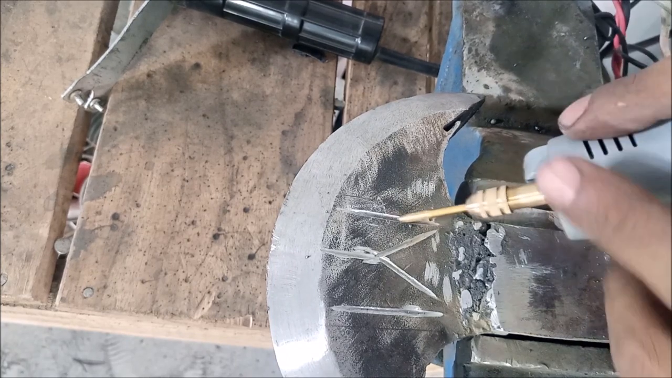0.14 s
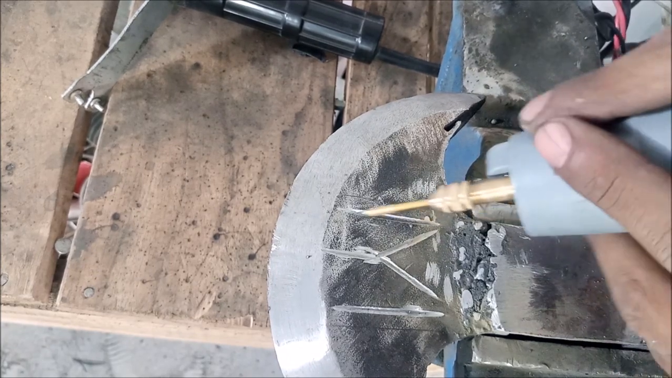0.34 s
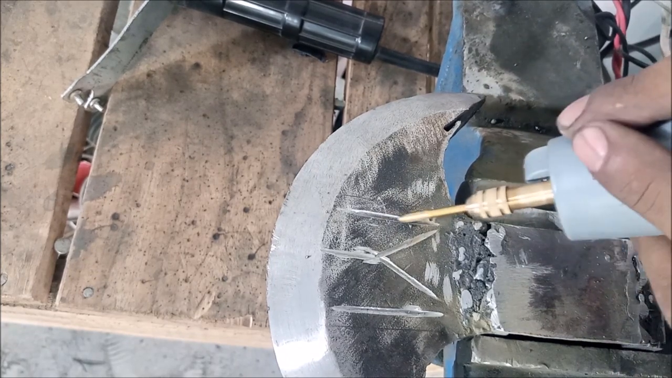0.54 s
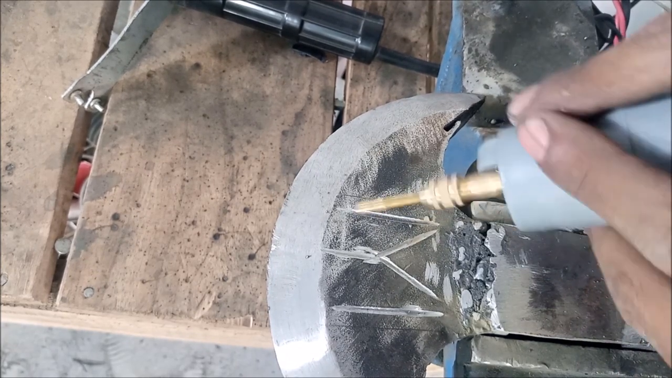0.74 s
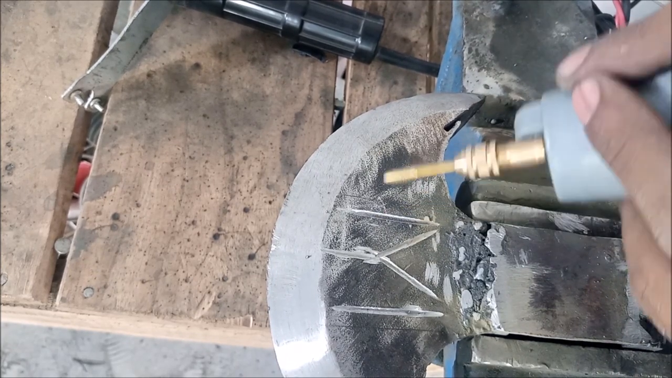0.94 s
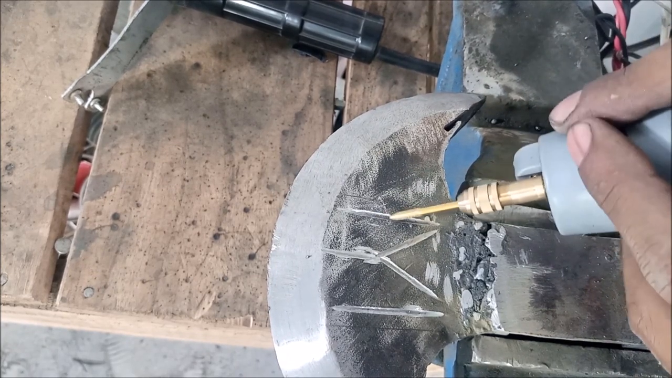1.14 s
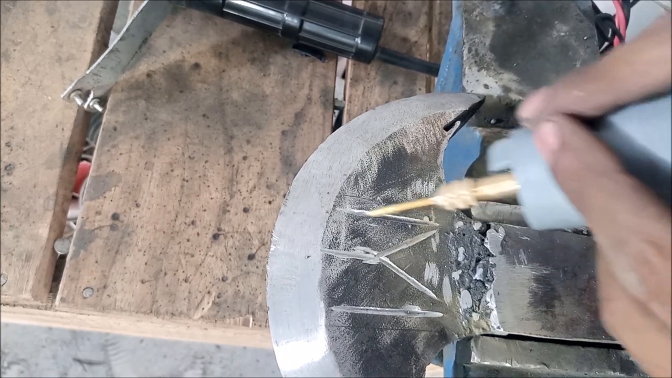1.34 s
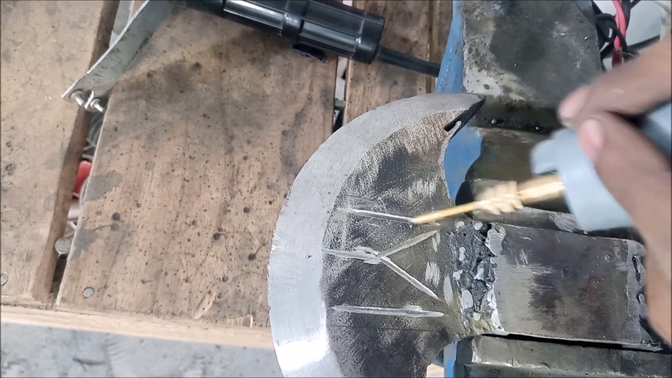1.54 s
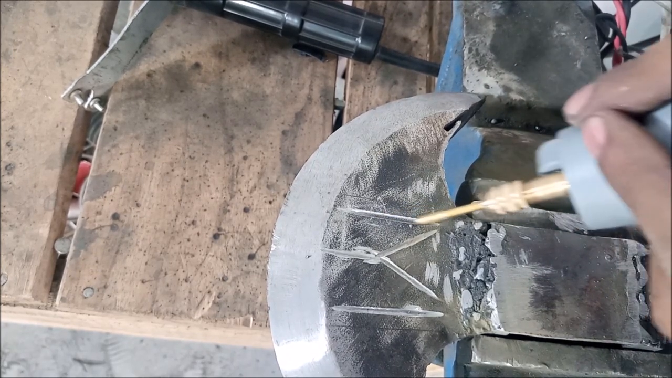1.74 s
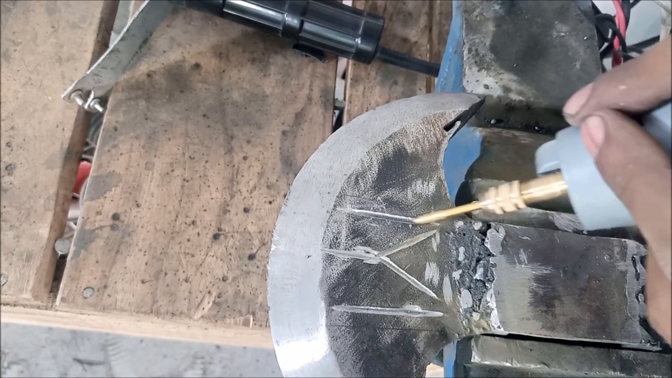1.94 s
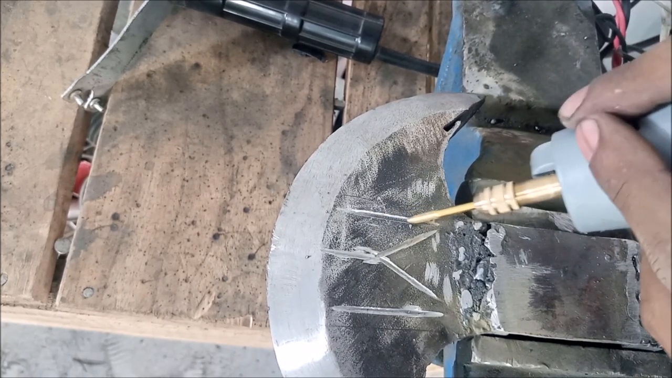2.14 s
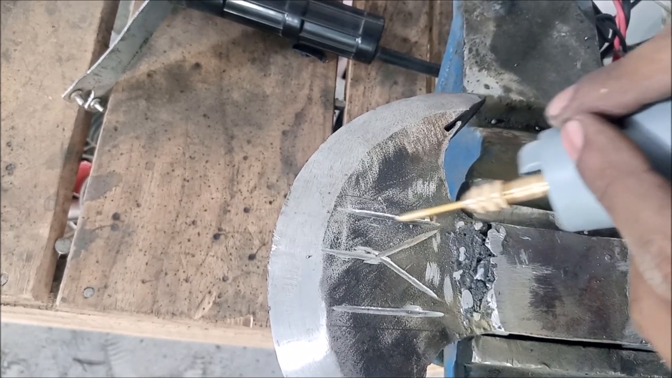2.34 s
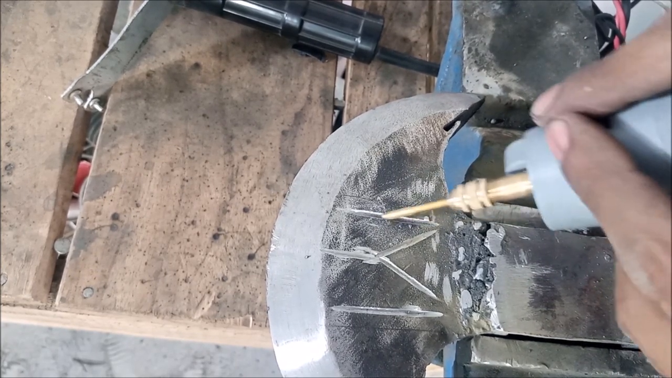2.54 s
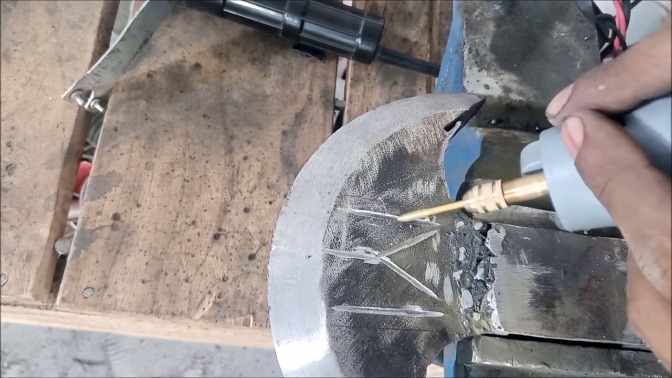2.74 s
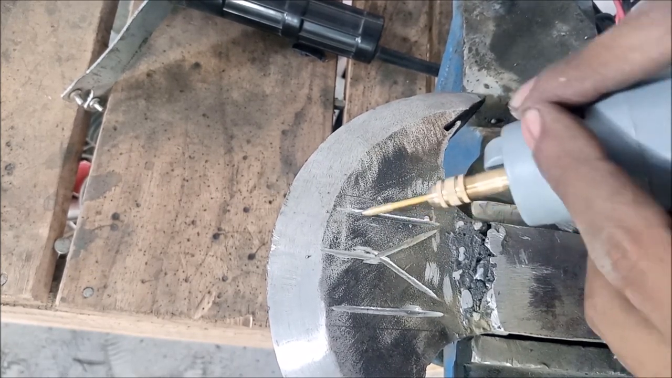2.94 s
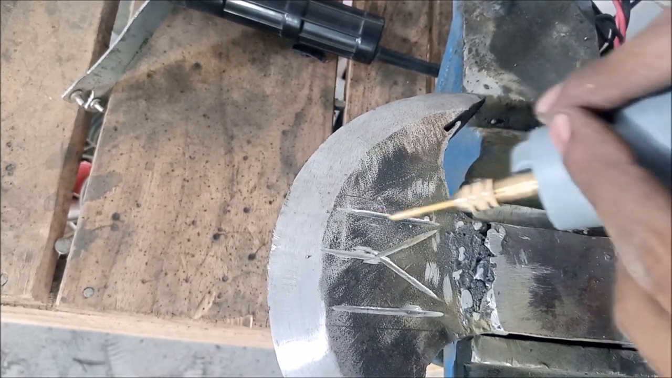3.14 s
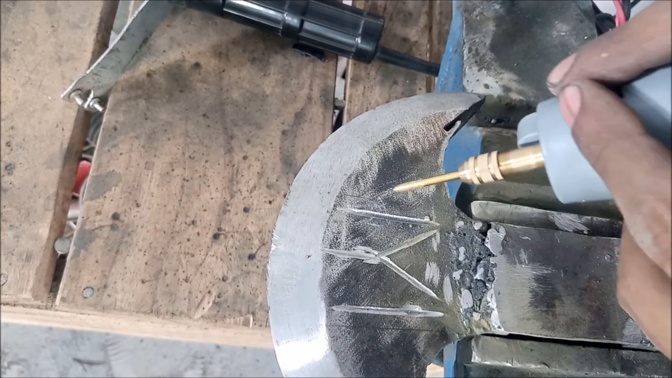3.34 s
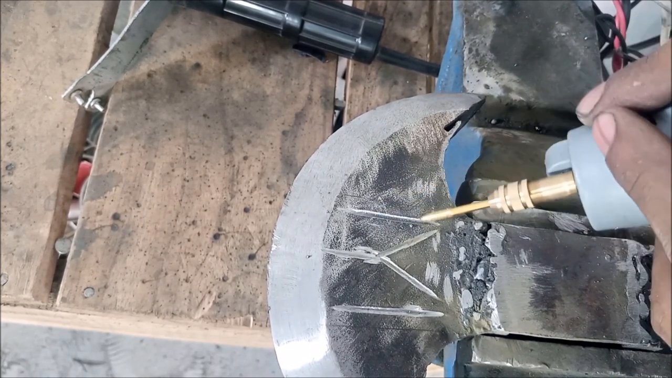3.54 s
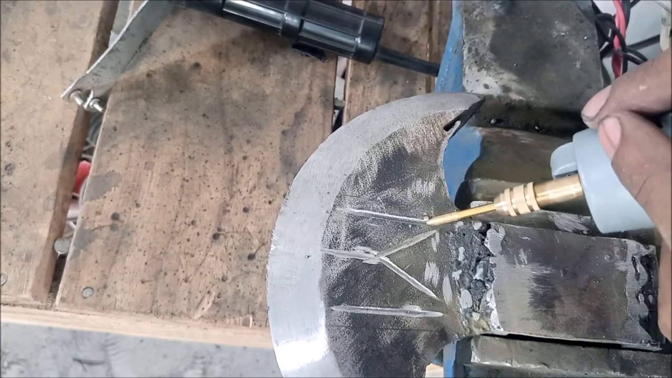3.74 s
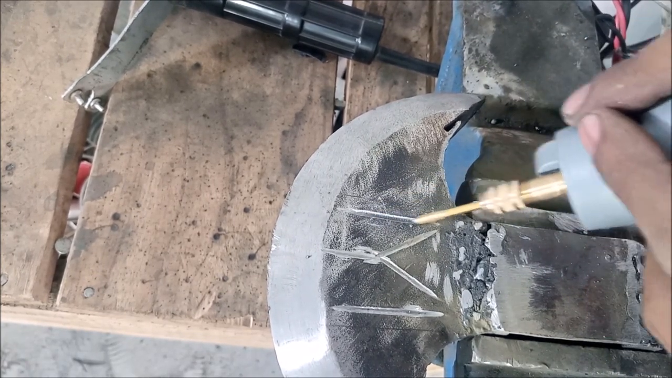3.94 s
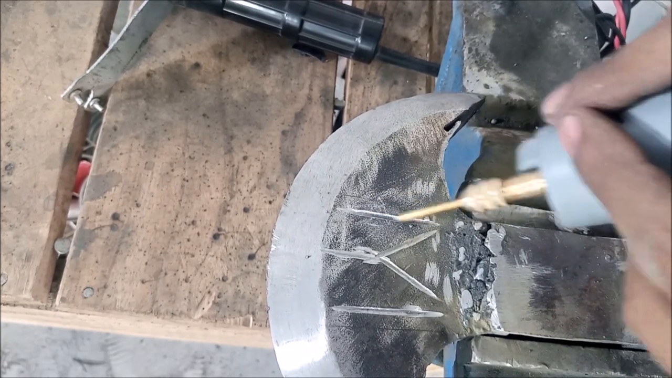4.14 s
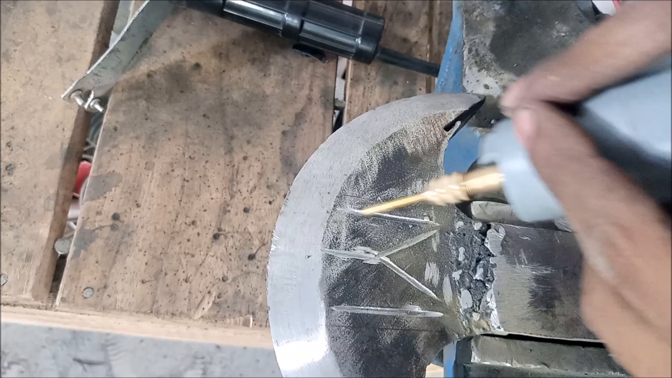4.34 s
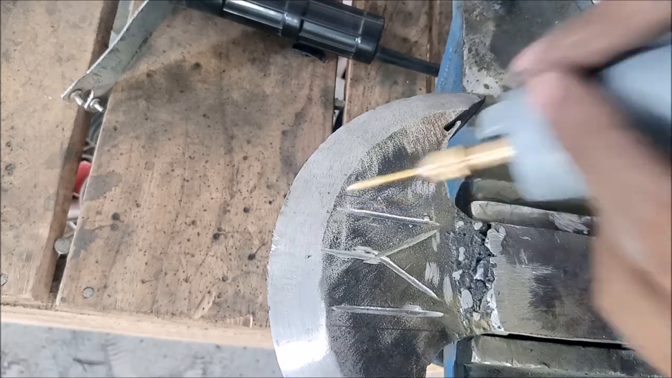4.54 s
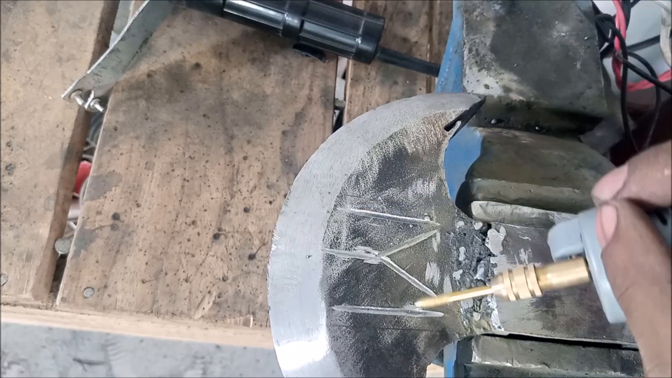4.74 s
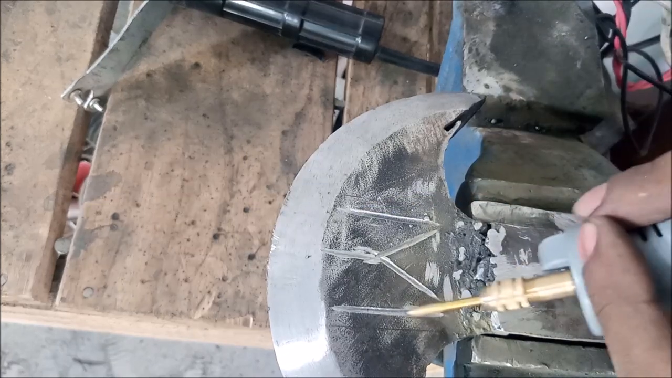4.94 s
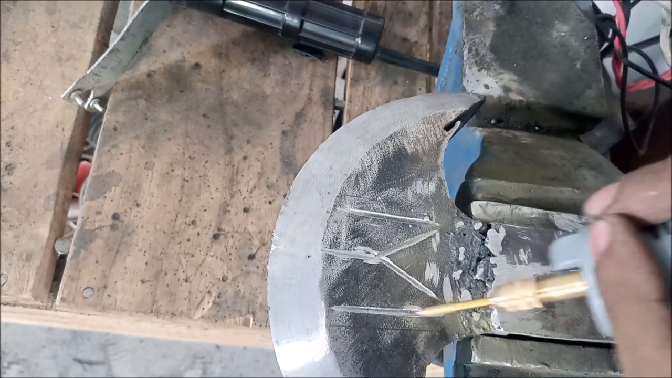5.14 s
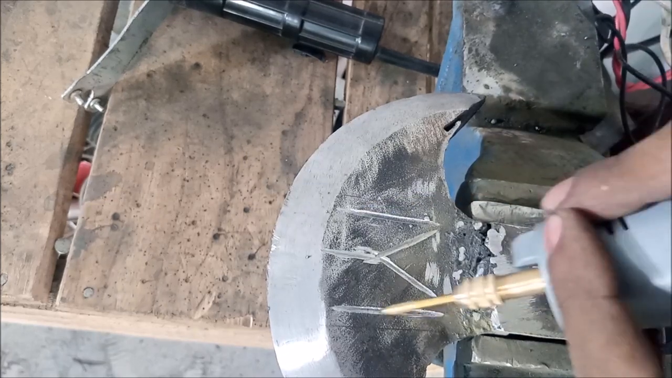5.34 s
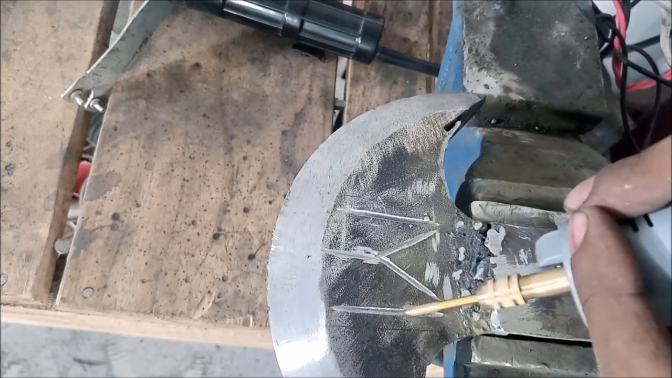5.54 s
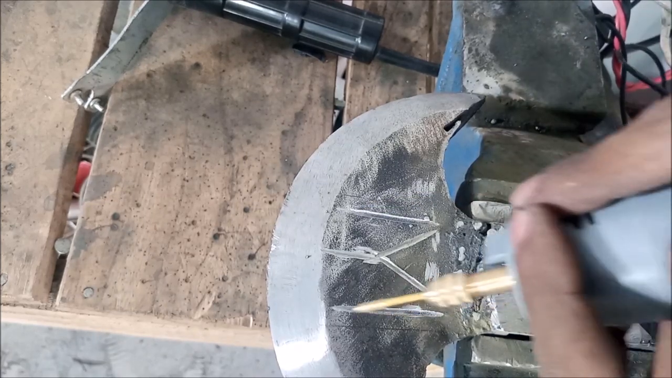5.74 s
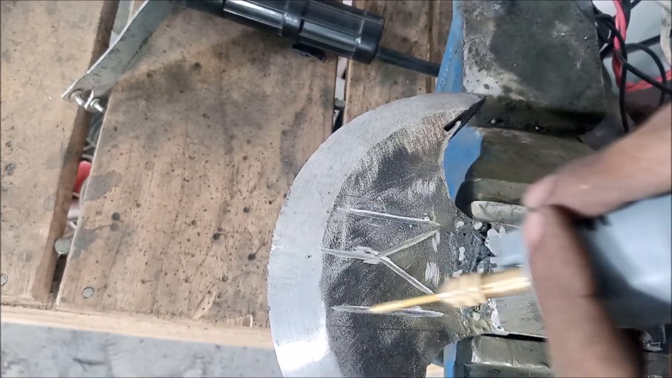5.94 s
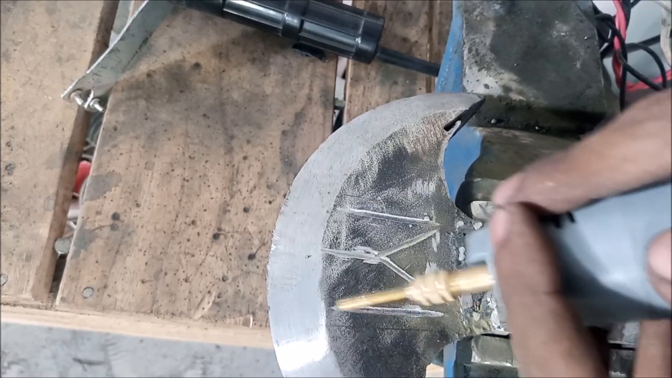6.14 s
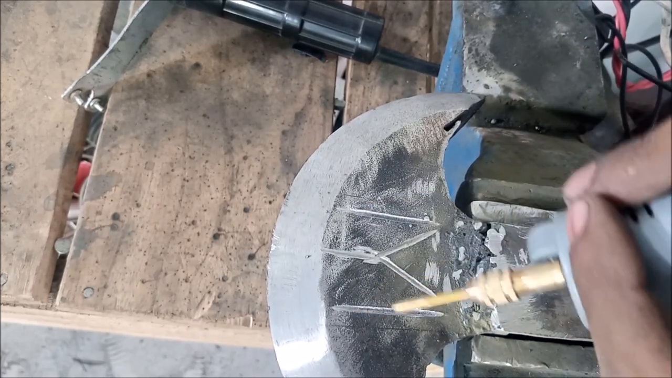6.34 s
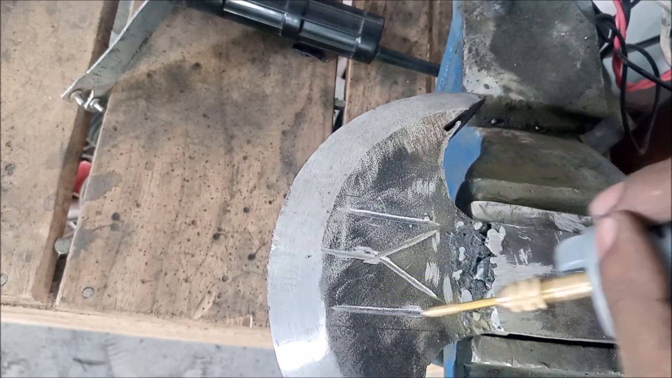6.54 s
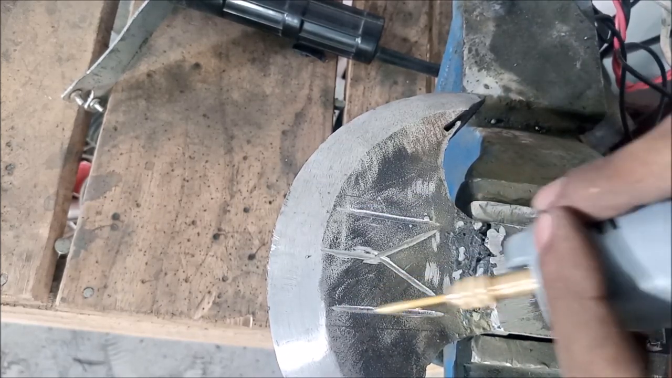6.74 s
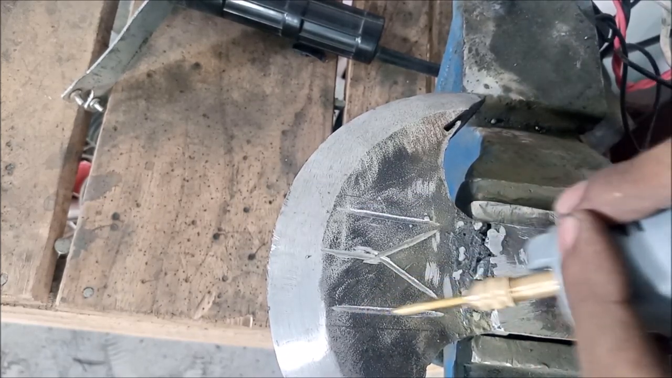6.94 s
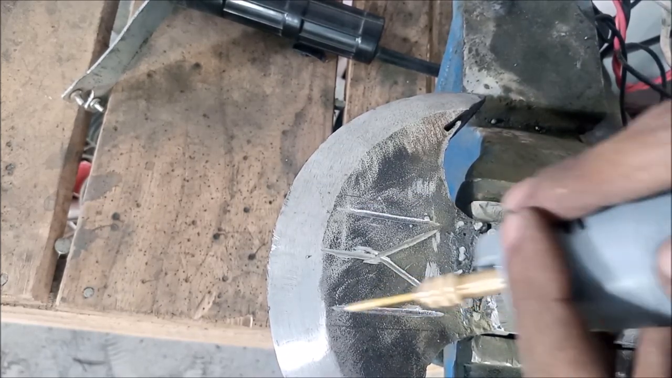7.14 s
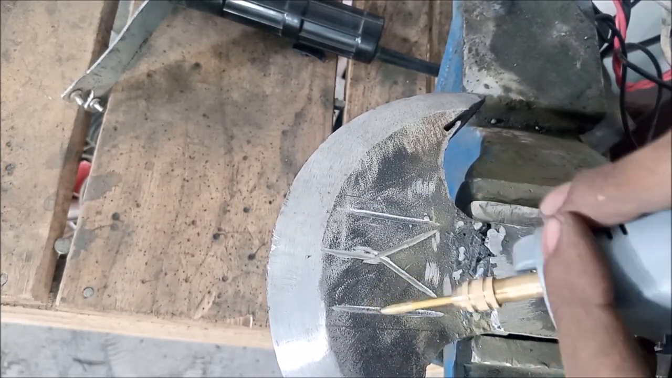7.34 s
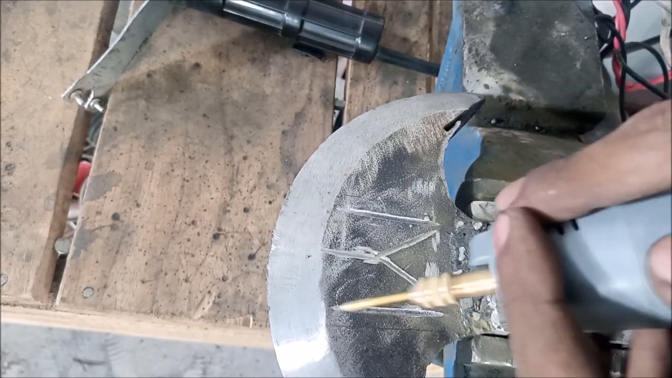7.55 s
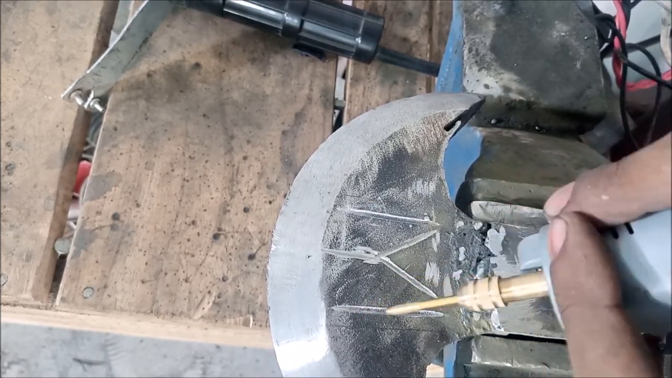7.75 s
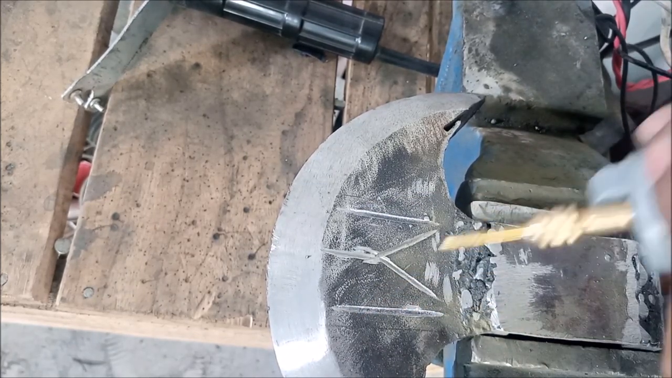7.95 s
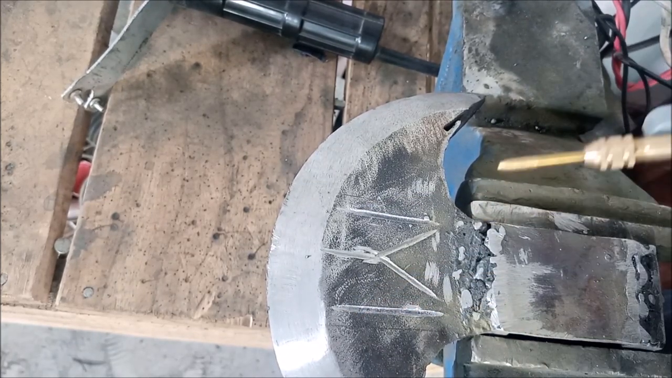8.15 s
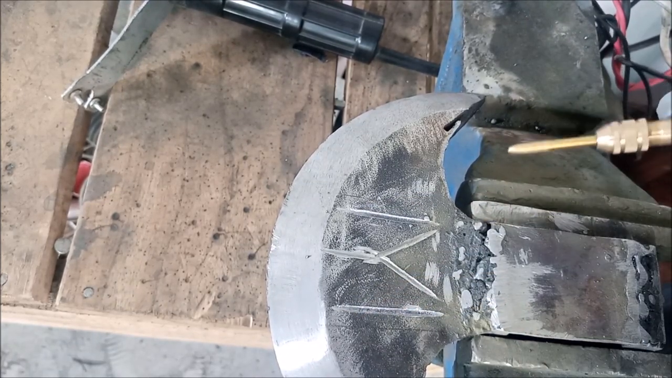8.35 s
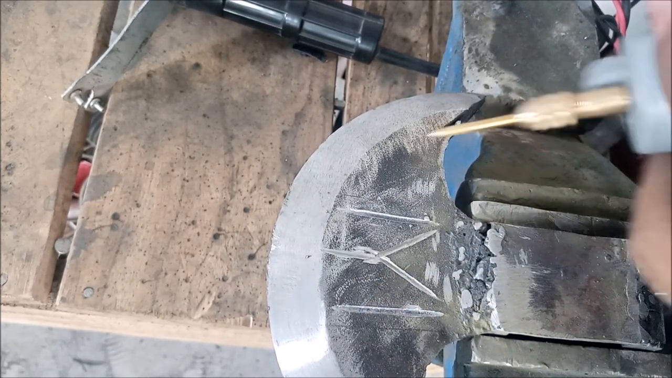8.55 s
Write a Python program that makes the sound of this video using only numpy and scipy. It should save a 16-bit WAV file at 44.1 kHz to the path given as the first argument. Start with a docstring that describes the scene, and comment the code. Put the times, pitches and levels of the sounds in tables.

```python
"""Engraving steel with a small rotary tool

A small rotary tool engraves two grooves in a clamped steel piece, in six strokes, heard from close by.
Free, its motor whines steadily: a stack of tones at multiples of the shaft speed, over a rush of air.
Pressed down, it slows with every push of the hand; the burr (the cutting tip) chatters once a turn
and grinds with a bright sizzle, made of those tones and noise shaped like the sound of the steel.
One high tone of the metal sings on after each lift. Dull bumps and a low hum come from the workshop."""
import sys
import numpy as np
from scipy import signal
from scipy.fft import rfft, irfft, next_fast_len
from scipy.io import wavfile
from scipy.ndimage import uniform_filter1d

SR = 44100
rng = np.random.default_rng(int(sys.argv[2]) if len(sys.argv) > 2 else 0)


def dump_mix(stems):
    """Bounce the given channels to the path in sys.argv[1] as a 16-bit WAV at rate SR."""
    frames = np.atleast_2d(stems).T  # one column per channel
    limited = np.clip(frames, -1, 1)  # hard clip at full scale
    pcm = np.round(limited * 32767).astype(np.int16)
    wavfile.write(sys.argv[1], SR, pcm)


N = 382788

# The times when the burr is on the metal, and base levels that the functions below vary:
# (touch [s], lift [s], snag [dB], growl [dB], rasp [dB], sizzle [dB], sizzle drift [dB per s],
#  shrill orders [dB], third order [dB], rubbed singing tone [dB], ring at the lift [dB])
STROKES = [(-.09, 0.988, -60, -49.5, -40.5, -28.5, 4, 0, 2, -43, -68),
           (1.257, 3.474, -43.5, -47.5, -40, -26.5, .5, 5, 0, -42, -29.5),
           (3.661, 3.8, -42.5, -45.5, -37.5, -24, -1, -9, -3, -58, -40.5),
           (3.88, 4.669, -48, -45.5, -37.5, -27.5, -2, 0, -1.5, -47, -33),
           (4.969, 6.382, -43, -45.5, -38, -27.5, -2, 5.5, -8, -40, -34.5),
           (6.589, 8.05, -45, -45.5, -38, -28.8, -0.5, 5.5, -17, -39.5, -27)]
# The hand pushes the burr along in short shoves; the slowing is the full height of the ramp, before its cap:
# (deepest moment [s], build-up [s], easing off [s], slowing [Hz], leading order [multiple of shaft speed],
#  growl [dB], rasp [dB], sizzle [dB])
PUSHES = [(0.354, 0.185, 0.059, 12, 7, -1.5, 0.5, 0.0), (0.476, 0.095, 0.033, 22, 5, 0.0, -1.0, 0.5),
          (0.606, 0.066, 0.046, 32, 4, -2.0, 0.5, -0.5), (0.746, 0.088, 0.042, 28, 4, -1.5, 0.5, 1.0),
          (0.869, 0.068, 0.061, 28, 5, -2.5, 0.5, -0.5), (1.381, 0.085, 0.049, 20, 4, -0.5, 0.0, 0.0),
          (1.505, 0.052, 0.036, 55, 7, -2.5, 1.0, -1.0), (1.618, 0.07, 0.044, 58, 6, -2.5, 1.5, -1.5),
          (1.754, 0.091, 0.05, 38, 4, -0.5, -1.0, 0.0), (1.87, 0.07, 0.048, 37, 4, -0.5, 0.5, 2.0),
          (1.969, 0.062, 0.055, 27, 6, -1.0, -1.5, 1.5), (2.083, 0.095, 0.033, 22, 6, -1.0, -1.0, -1.0),
          (2.185, 0.058, 0.047, 24, 6, -1.5, -0.5, 0.5), (2.277, 0.05, 0.05, 25, 6, -0.5, 1.5, 0.5),
          (2.377, 0.049, 0.044, 36, 8, 1.0, 2.5, 0.0), (2.48, 0.068, 0.048, 45, 6, 0.5, 0.5, 0.5),
          (2.59, 0.073, 0.05, 62, 5, -0.5, 1.0, -1.0), (2.694, 0.069, 0.045, 53, 5, -0.5, 1.0, -1.0),
          (2.796, 0.068, 0.055, 36, 8, -1.0, -0.5, 0.5), (2.943, 0.141, 0.047, 26, 8, -1.0, 0.5, -0.5),
          (3.066, 0.078, 0.057, 39, 8, 0.0, -1.0, 0.5), (3.204, 0.076, 0.054, 44, 5, 0.5, 1.0, 1.0),
          (3.353, 0.093, 0.053, 41, 8, -0.5, 3.0, -0.5), (3.735, 0.045, 0.1, 8, 6, -1.5, -0.5, -2.5),
          (4.059, 0.104, 0.065, 26, 6, 1.5, 1.5, -1.0), (4.209, 0.104, 0.045, 50, 4, -1.0, -1.5, 0.5),
          (4.34, 0.152, 0.055, 53, 7, -1.5, -0.5, 1.0), (4.495, 0.231, 0.05, 80, 7, -1.0, -1.5, -1.0),
          (4.62, 0.072, 0.08, 37, 7, -1.5, 0.5, 0.5), (5.093, 0.118, 0.045, 26, 6, -2.0, 2.5, -1.5),
          (5.215, 0.059, 0.048, 34, 6, -2.0, 0.5, 0.0), (5.349, 0.099, 0.053, 49, 7, -2.5, 0.5, 2.0),
          (5.495, 0.117, 0.063, 50, 6, -1.0, 0.0, 1.0), (5.63, 0.111, 0.037, 72, 6, 0.5, 0.0, 0.5),
          (5.754, 0.166, 0.06, 78, 6, 0.0, 0.0, -0.5), (5.902, 0.093, 0.05, 90, 8, -1.0, -1.5, -0.5),
          (6.025, 0.105, 0.055, 73, 6, 0.5, -0.5, 0.0), (6.144, 0.115, 0.059, 33, 6, 0.5, 1.5, 0.5),
          (6.273, 0.067, 0.05, 52, 6, -1.5, -1.5, 0.5), (6.745, 0.052, 0.048, 31, 4, 1.5, 1.5, 1.0),
          (6.886, 0.078, 0.051, 83, 5, -2.0, 0.0, 0.5), (7.016, 0.094, 0.055, 99, 6, -2.0, 1.0, 0.5),
          (7.158, 0.142, 0.055, 115, 6, -0.5, -0.5, 1.0), (7.253, 0.106, 0.069, 54, 6, 2.5, -0.5, 0.0),
          (7.409, 0.073, 0.055, 43, 8, 1.5, -0.5, -0.5), (7.549, 0.071, 0.059, 97, 5, -1.0, -0.5, -1.0),
          (7.666, 0.074, 0.048, 77, 6, -1.5, 0.5, -0.5), (7.8, 0.108, 0.064, 47, 7, 0.5, -1.0, 1.0),
          (7.955, 0.096, 0.075, 92, 5, -1.0, 0.0, 1.0)]

FREE_HZ = 399.8  # speed of the free shaft, turns per second
DIP_S = .015  # half-width of the brief dips in the hiss, for a deep dip


def amp(db):
    """Turn decibels into a gain."""
    return 10 ** (np.asarray(db) / 20)


def unit(x):
    """Scale to an average strength (rms) of 1."""
    return x / np.sqrt(np.mean(x ** 2) + 1e-20)


def clock():
    """Time of every sample in seconds."""
    return np.arange(N) / SR


def curves(rows):
    """Join the points of a table: one value per sample for each column after the time."""
    s, *columns = np.transpose(rows)
    return [np.interp(clock(), s, column) for column in columns]


def wobble(rate):
    """A random wandering curve of rms 1, with rate turning points a second."""
    knots = rng.standard_normal(N // 8)
    return unit(np.interp(clock() * rate, np.arange(len(knots)), knots))


def filtered(x, response):
    """Give each frequency of x the gain that response names for it."""
    size = next_fast_len(N + SR // 4)
    gain = response(np.fft.rfftfreq(size, 1 / SR))
    return irfft(rfft(x, size) * gain, size)[..., :N]


def coloured(x, spectrum):
    """Shape x by (frequency [Hz], level [dB]) points, silent outside them, at rms 1."""
    f, db = np.transpose(spectrum)

    def response(hz):
        """Straight lines between the points, on a logarithmic pitch scale."""
        return amp(np.interp(np.log(hz + 1), np.log(f), db, -np.inf, -np.inf))

    return unit(filtered(x, response))


def noise(spectrum):
    """Coloured noise of rms 1."""
    return coloured(rng.standard_normal(N), spectrum)


def patchy(depth_db, size):
    """White noise with random patches of gain, a few windows of that size long and a few bins wide."""
    z = signal.stft(rng.standard_normal(N), nperseg=size)[2]
    field = uniform_filter1d(rng.standard_normal(z.shape), size=6, axis=0)
    field = uniform_filter1d(field, size=6, axis=1)
    return unit(signal.istft(z * amp(depth_db * unit(field)), nperseg=size)[1][:N])


def per_stroke():
    """The row of the latest stroke at every sample, column by column."""
    rows = np.array(STROKES)
    latest = np.maximum(np.searchsorted(rows[:, 0], clock()) - 1, 0)
    return rows[latest].T


def contact(lift_s):
    """1 while the burr cuts: it bites within a millisecond and leaves with a decay time of lift_s."""
    t = clock()
    return sum(np.clip((t - touch) * 1000, 0, 1) * np.exp(-np.maximum(t - lift, 0) / lift_s)
               for touch, lift, *_ in STROKES)


def hiss_gain(width_s):
    """Gain of the noise through its brief dips; the deeper ones last longer."""
    # moments when the hiss dips and the tones stand bare: (time [s], depth [dB])
    dips = [(.58, 10), (.708, 9), (.816, 10), (.859, 11), (1.445, 29), (1.541, 10), (1.733, 10),
            (1.811, 26), (2.244, 9), (2.374, 11), (3.077, 10), (3.332, 10), (3.567, 14), (3.72, 8),
            (4.635, 14), (5.402, 10), (5.756, 27), (5.936, 10), (6.121, 25), (6.275, 11), (6.766, 9),
            (6.853, 12), (7.175, 10), (7.216, 8), (7.578, 10), (7.857, 9), (7.941, 10), (8.39, 7),
            (8.475, 10)]
    deep_dip_db = 22  # the depth at which width_s is the half-width
    t = clock()
    return amp(-sum(depth * np.exp(-((t - s) / width_s) ** 2 * deep_dip_db / depth) for s, depth in dips))


def sag_hz():
    """Speed lost to the cut: the weight of the hand through each stroke, and a ramp up and down for each push."""
    rest_sag_hz = 31.4  # lost to the full resting weight of the hand
    settle_s, spin_up_s = .163, .04  # time to settle in, to spin up at the lift
    full_stroke_s = .35  # shortest stroke that gets the full weight
    stall_share = .86  # a push stops sinking at this share of its ramp, and the speed rests there a moment
    t = clock()
    touch, lift, *_ = per_stroke()
    weight = np.minimum((lift - touch) / full_stroke_s, 1)
    settling = np.minimum((t - touch) / settle_s, .5 + (lift - t) / spin_up_s)
    resting = weight * np.clip(settling, 0, 1)
    ramps = [(hz, np.interp(t, [s - build, s, s + ease], [0, 1, 0])) for s, build, ease, hz, *_ in PUSHES]
    pushing = sum(hz * np.minimum(1.06 * ramp, stall_share) for hz, ramp in ramps)
    return uniform_filter1d(rest_sag_hz * resting + pushing, SR // 60)  # the speed cannot jump


def shaft():
    """Shaft angle, and the load: the share of free speed lost to the cut."""
    load = np.clip(sag_hz() / FREE_HZ, 0, 1)
    bite = load * (.02 * wobble(150) + .01 * wobble(35))
    unsteady = 0.00024 * wobble(150) + bite  # the bite makes the turning uneven
    return 2 * np.pi * np.cumsum(FREE_HZ * (1 - load + unsteady)) / SR, load


def slowing_rate(load):
    """How fast the shaft slows, in Hz per ms: positive while a push builds up."""
    return uniform_filter1d(np.gradient(load * FREE_HZ) * SR / 1000, SR // 40)


def lead_db(order):
    """Each push favours one order of the chatter, which swells as the push builds up."""
    swell_db, half_width_s = 3.5, .05
    t = clock()
    return sum(swell_db * np.exp(-((t - s + build / 3) / half_width_s) ** 2)
               for s, build, _, _, lead, *_ in PUSHES if lead == order)


def chatter(angle, light, count):
    """The burr knocks once a turn, never quite on time: fluttering tones at multiples (orders) of shaft speed."""
    # orders that stand out in every stroke: (multiple of the shaft speed, level [dB])
    strong_orders = [(4, .5), (5, 1), (6, -.5), (7, 2), (8, 1), (11, 1), (12, 2.5), (15, 3), (16, 1.5)]
    # orders whose level each stroke sets: (multiple of the shaft speed, multiple of the shaft speed)
    shrill_orders = (13, 14)
    bare_shrill_db = 3.5  # the shrill orders stand out in the dips
    light_third_db = 2  # the third order gains this at the lightest touch
    knock_scatter = .015  # timing scatter in a firm cut, radians of a turn; breaks up the high orders
    *_, shrill_db, third_db, _, _ = per_stroke()
    hiss = hiss_gain(DIP_S)
    order_db = dict(strong_orders)
    for k in shrill_orders:
        order_db[k] = shrill_db + bare_shrill_db * (1 - hiss)
    order_db[3] = third_db + light_third_db * light
    gains = {k: amp(db + lead_db(k)) for k, db in order_db.items()}
    knock = angle + knock_scatter * (1 + 2 * light) * hiss * wobble(250)

    def flutter(k):
        """Random swelling, stronger for the higher orders."""
        return (1 + min(.03 * k, .35) * wobble(90)) * amp(min(.3 * k, 3) * wobble(22))

    # the weak orders, which have no gain of their own, sink in the dips
    return sum(gains.get(k, hiss) * flutter(k) * np.sin(k * knock + rng.uniform(0, 2 * np.pi))
               for k in range(3, count))


def cut_levels(load):
    """Growl, rasp and sizzle in dB: each stroke and each push has its own strength, and the slowing swings it."""
    # slow drift in the level of the growl: (time [s], level [dB])
    growl_drift = [(0, 5), (.4, -0.5), (1, 3), (1.3, 1.5), (1.95, -1.5), (2.7, 0.8), (3.5, 1.3),
                   (8.1, -1.7)]
    # swing for each Hz per ms that the shaft slows [dB]
    growl_push_db, rasp_push_db, sizzle_push_db = 0.75, -0.63, 0.1
    leave_s, leave_db = 0.09, -1.5  # growl and rasp grow quieter as the hand lets up before each lift
    touch, lift, _, growl_db, rasp_db, sizzle_db, drift, *_ = per_stroke()
    push_rows = [(s - build / 3, *levels) for s, build, _, _, _, *levels in PUSHES]
    own_growl_db, own_rasp_db, own_sizzle_db = curves(push_rows)
    slowing = slowing_rate(load)
    from_middle_s = np.minimum(clock(), lift) - (touch + lift) / 2
    bare_db = 4.5 * (1 - hiss_gain(width_s=0.019))  # the sizzle stands out where the hiss dips
    leaving_db = leave_db * np.exp(-np.abs(lift - clock()) / leave_s)

    def stray_db():
        """Small random changes of level."""
        return .55 * wobble(40)

    growl_db = growl_db + own_growl_db + growl_push_db * slowing + curves(growl_drift)[0] + leaving_db
    rasp_db = rasp_db + own_rasp_db + rasp_push_db * slowing + leaving_db
    sizzle_db = sizzle_db + own_sizzle_db + sizzle_push_db * slowing + drift * from_middle_s + bare_db
    return growl_db + stray_db(), rasp_db + stray_db(), sizzle_db + stray_db()


def cutting_edges(sizzle, load):
    """The sizzle brightens as each push builds up, dulls as it eases, and drops when the edges lose their bite."""
    # instants when the edges lose their bite: (time [s], depth [dB], half-width [s])
    skips = [(.92, 5, .012), (1.279, 16, .004), (3.41, 3, .02), (6.3, 4, .01), (6.64, 4, .008),
             (6.91, 4, .016), (7.452, 4, .012), (7.98, 5, .008)]
    bright_hz = 14200  # the top of the sizzle lies above this
    bright_push_db = 2.6  # swell of the top for each Hz per ms of slowing
    top = filtered(sizzle, lambda hz: .5 + .5 * np.tanh((hz - bright_hz) / 600))
    swing_db = bright_push_db * np.clip(slowing_rate(load), -2, 1)
    skip_db = sum(depth * np.exp(-((clock() - s) / width) ** 2) for s, depth, width in skips)
    return amp(-skip_db) * (sizzle + (amp(swing_db) - 1) * top)


def grinding(angle, load):
    """Regular chatter and random chipping drive the metal; more load makes the chatter clearer."""
    # what the piece radiates in three bands, one spectrum for each groove: (frequency [Hz], level [dB per Hz])
    growl_spectra = [
        [(500, -8), (880, -4), (1080, 2), (1350, 5), (1520, 0), (1690, 6), (1950, 0), (2150, 2.5), (2400, 3),
         (2800, -6.5), (3400, -16), (3900, -11)],
        [(500, -6), (1000, 1), (1190, 7), (1320, 8), (1500, 1), (1700, 7), (1850, 2.5), (2050, 6), (2400, 0),
         (2750, -3.5), (3100, -13), (3900, -36)],
    ]
    rasp_spectra = [
        [(2400, -13.5), (3400, -11.5), (4050, -4), (4300, -5), (4850, -2.5), (5600, -3), (6900, -7),
         (7500, -1.5), (9000, -3.5), (10000, -0.5), (11500, -0.5), (13000, -15)],
        [(2400, -17), (3450, -10.5), (3950, -2.5), (4400, -5), (4750, -1), (5400, -5.5), (6600, -8.5),
         (7700, -2.5), (8400, -6.5), (10100, -4.5), (10550, 0.5), (11500, -3.5), (13000, -21)],
    ]
    sizzle_spectra = [
        [(10500, -55), (11900, -13), (12400, -4), (12950, -3), (13300, 4), (13900, 3.5), (14400, .5),
         (14850, -5), (15300, -6), (15750, -10)],
        [(10500, -40), (11900, -10), (12400, -1), (13000, 0), (13350, 3.5), (14050, 5.5), (14700, 1),
         (15300, -4), (15750, -9)],
    ]  # the bright sound of the cutting edges
    # a thin scrape rides on the first stroke and the start of the second: (time [s], level [dB])
    scrape_levels = [(.15, -51), (.35, -42.5), (.6, -44), (.88, -41), (1, -60), (1.33, -44), (1.7, -47),
                     (2.1, -64)]
    move_s = 4.8  # the hand moves from the first groove to the second
    firm_load = .12  # share of the free speed that is lost in a firm cut
    growl_tone_db, rasp_tone_db = 6.5, -1.3  # chatter over chipping noise, in a firm steady cut
    light_tone_db = -5.5  # the chatter is less clear at the lightest touch
    growl_clear_db, rasp_clear_db = 6, 3  # clearer chatter for each Hz per ms of slowing
    tail_db, tail_s = -14, .035  # the workshop holds the grinding briefly: level, decay time
    t = clock()
    light = 1 - np.minimum(load / firm_load, 1)  # 1 at the lightest touch, 0 in a firm cut
    knocks = chatter(angle, light, count=52)
    turn_db = 0.35 * np.sin(angle) + 1.0 * np.sin(2 * angle)
    bite_db = turn_db + 1.1 * wobble(1100) + 0.47 * wobble(60)
    chips = amp(bite_db) * patchy(depth_db=1.6, size=256)

    def radiate(spectra, level_db, tone_db, hiss):
        """Chatter and chipping through the spectrum of the groove in hand."""
        tone = amp(tone_db + light_tone_db * light)
        first, second = [tone * coloured(knocks, s) + hiss * coloured(chips, s) for s in spectra]
        return amp(level_db) * np.where(t < move_s, first, second) / np.hypot(tone, 1)

    growl_db, rasp_db, sizzle_db = cut_levels(load)
    hiss = hiss_gain(DIP_S)
    slowing = np.minimum(slowing_rate(load), .5)
    growl = radiate(growl_spectra, growl_db + wobble(70), growl_tone_db + growl_clear_db * slowing, hiss)
    rasp = radiate(rasp_spectra, rasp_db + wobble(70), rasp_tone_db + rasp_clear_db * slowing, hiss)
    sizzle = radiate(sizzle_spectra, sizzle_db + .5 * wobble(45), tone_db=-7.5, hiss=0.54)
    # the grit on the burr adds a narrow hiss that sweeps with the shaft speed
    grit_db = np.where(t < move_s, -19, -18)  # against the sizzle, in each groove
    sweep = wobble(700) * np.sin(44 * angle)
    grit = amp(sizzle_db + grit_db) * coloured(sweep, [(11500, -29), (13000, -9), (15000, 14), (15750, 10)])
    scrape_noise = noise([(7000, -22), (7700, -2.5), (8200, -5), (8900, -6.0), (10000, -14)])
    scrape = amp(curves(scrape_levels)[0]) * hiss * scrape_noise
    heard = np.maximum(contact(lift_s=0.0024), amp(tail_db) * contact(lift_s=tail_s))
    edges = cutting_edges(amp(1.33) * sizzle + grit, load)
    return heard * (growl + amp(-0.35) * rasp + scrape + edges)


def singing():
    """A lightly damped tone of the metal: restless while rubbed, swelling to each lift, pure as it rings out."""
    # the tone flares up under the burr: (time [s], level [dB])
    flare_levels = [(.26, -36), (1.57, -35), (1.759, -43), (2.97, -31), (3.12, -32), (3.31, -46),
                    (4.23, -34), (4.5, -33), (5.921, -34), (6.07, -34), (6.939, -34), (7.06, -42),
                    (7.59, -39), (7.93, -39)]
    sing_hz = 11592
    flare_s = 0.023  # half-width of a flare
    swell_db_per_s, ring_db_per_s = 189, 71  # it grows as the burr lightens, then rings out
    t = clock()
    _, lift, *_, rubbed_db, ring_db = per_stroke()
    rubbed = contact(lift_s=0.18)
    flares = sum(amp(db) * np.exp(-((t - s) / flare_s) ** 2) for s, db in flare_levels)
    ring = amp(ring_db - np.maximum(swell_db_per_s * (lift - t), ring_db_per_s * (t - lift)))
    phase = 2 * np.pi * np.cumsum(sing_hz + 6 * rubbed * wobble(60)) / SR
    restless = amp(rubbed_db - 3.0 + 4 * wobble(20)) * rubbed
    return (restless + flares + ring) * np.sin(phase)


def motor(angle, load):
    """Shaft orders from the commutator and bearings, over a rush of air; both are fainter under load."""
    # partials of the free-running motor, before its changes of level: (multiple of the shaft speed, level [dB])
    partials = [(1, -63), (2, -73), (3, -57.5), (5, -62), (6, -58.5), (7, -66), (8, -69), (9, -61),
                (10, -62.5), (11, -59.5), (13, -63.5), (14, -73), (15, -69), (16, -73), (17, -73),
                (18, -74), (21, -75), (23, -75), (24, -74), (25, -58), (26, -68), (27, -56), (28, -63),
                (29, -61), (30, -64), (31, -59), (32, -66), (33, -62), (34, -69), (35, -67), (36, -62),
                (37, -70), (38, -70), (39, -70)]
    # colour of the motor air: (frequency [Hz], level [dB per Hz])
    air_colour = [(400, -4.5), (800, -10.5), (1250, 1), (1700, -2), (2400, -4.5), (3300, -7), (4500, -8),
                  (6200, -3.5), (8500, -10), (11000, -6), (13000, -7), (15700, -13)]
    # the tenth order swells as the tool is drawn away and turned: (time [s], level [dB])
    turned_levels = [(7.9, -2), (8.1, -4), (8.3, 3), (8.44, 4.5), (8.48, 8), (8.68, 8)]
    # the idling motor, as the tool is held nearer or farther: (time [s], air [dB], whine [dB])
    idle_levels = [(1.1, -51.5, -0.5), (3.55, -48.5, 0), (4.8, -50.5, 2.5), (6.5, -52.5, 1.5),
                   (8.2, -51.5, 1), (8.68, -52.5, 0.5)]
    turned_db, = curves(turned_levels)

    def partial(k, db):
        """One wavering tone at k times the shaft speed."""
        waver_db = 1.3 * wobble(3) + 1.4 * wobble(25)
        level = amp(db + waver_db + turned_db * (k == 10))
        return level * np.sin(k * angle + rng.uniform(0, 2 * np.pi))

    whine = sum(partial(k, db) for k, db in partials)
    lifted = clock() > per_stroke()[1]
    # after a lift only the fading contact brings the motor back up
    loaded = np.maximum(np.minimum(load / 0.053, 1), lifted) * contact(lift_s=0.01)
    air_db, whine_db = curves(idle_levels)
    air = amp(air_db - 12.3 * loaded + 2.8 * wobble(14)) * hiss_gain(DIP_S) * noise(air_colour)
    return amp(whine_db - 12 * loaded) * whine + air


def workshop():
    """Low room noise with a wavering hum, fainter during the strokes, and dull bumps."""
    # colour of the room noise: (frequency [Hz], level [dB per Hz])
    shop_colour = [(18, -26), (60, -35), (100, 1), (150, 3), (300, 5), (500, -1.5), (750, 5.5), (1100, -17),
                   (2000, -42)]
    # tones of the hum between strokes: (frequency [Hz], level [dB over the room level])
    hum_tones = [(132.2, -5), (397.5, -23), (533, -29), (662.5, -2.5)]
    # dull bumps at the bench, all raised by 1 dB below: (time [s], level [dB], length [s])
    bumps = [(0.329, -49, 0.02), (0.523, -54.5, 0.037), (0.889, -55, 0.03), (0.987, -44.5, 0.042),
             (1.19, -58, 0.16), (2.263, -56, 0.019), (3.274, -57.5, 0.037), (3.469, -57, 0.044),
             (3.823, -49.5, 0.056), (4.31, -47, 0.079), (4.464, -56, 0.022), (5.365, -61, 0.081),
             (6.379, -44, 0.061), (6.435, -50, 0.038), (7.408, -54, 0.021), (7.514, -55, 0.032),
             (7.647, -55, 0.014), (8.057, -55, 0.15)]
    # colour of the bumps: (frequency [Hz], level [dB per Hz])
    thud_colour = [(50, -28), (110, -5.5), (160, 2.5), (260, -3), (420, -10), (700, -14), (1500, -22)]
    hum_cut_db = -3  # the hum is fainter still during the strokes
    t = clock()
    hum = sum(amp(db + 2.3 * wobble(10)) * np.sin(2 * np.pi * hz * t + .7 * wobble(10))
              for hz, db in hum_tones)
    cutting = uniform_filter1d(contact(lift_s=.01), SR // 12)
    drift_db = (1.5 + 1.3 * cutting) * wobble(16)
    room_hiss = hiss_gain(DIP_S) * coloured(patchy(depth_db=2.3, size=1024), shop_colour)
    room = amp(-57.0 - 10 * cutting + drift_db) * (room_hiss + amp(hum_cut_db * cutting) * hum)
    rumble = amp(-82.5) * noise([(15, -1), (40, -6), (90, -6)])
    ages = [(np.maximum(t - s, 0) / length, db) for s, db, length in bumps]  # in lengths of the bump
    swell = sum(amp(db) * np.minimum(6 * age, 1) * np.exp(-age ** 2) for age, db in ages)
    return room + rumble + amp(1) * swell * noise(thud_colour)


def snags(decay_s):
    """A sharp tick and a short scratch as the burr lands: noise that dies away at two speeds."""
    touch, _, snag_db, *_ = per_stroke()
    age = np.abs(clock() - touch)
    envelope = amp(snag_db) * (np.exp(-age / decay_s) + 1.3 * np.exp(-age / .004))
    return envelope * noise([(600, -14), (1500, -4), (4500, 17), (8000, -3), (15000, -20)])


def catches():
    """Short scratches of coarse chips where the burr digs in."""
    # moments when the burr catches in the groove: (time [s], level [dB], half-width [s])
    catch_times = [(1.32, -42.5, .025), (3.943, -39, 0.012), (4.661, -36.5, 0.011), (7.198, -44, 0.0043),
                   (7.982, -39.5, 0.012)]
    # colour of the scratch: (frequency [Hz], level [dB per Hz])
    scratch_colour = [(700, -3.5), (1250, 0.5), (2400, -1.5), (3300, -2), (4700, -2.5), (9000, -7),
                      (13000, -30)]
    envelope = sum(amp(db) * np.exp(-((clock() - s) / width) ** 2) for s, db, width in catch_times)
    coarse = amp(1.2 * wobble(1500)) * rng.standard_normal(N)
    return envelope * coloured(coarse, scratch_colour)


def scene():
    """All the sounds together, in the middle."""
    angle, load = shaft()
    tool = grinding(angle, load) + singing() + motor(angle, load)
    mid = tool + workshop() + snags(decay_s=0.045) + catches()
    return np.array([mid, mid])


def record(dry):
    """Keep only what lies below the top of the band."""
    top_hz = 15800
    return filtered(dry, lambda hz: hz < top_hz)


dry = scene()
out = record(dry)
dump_mix(out)
```